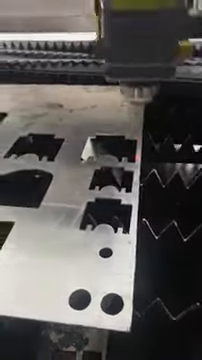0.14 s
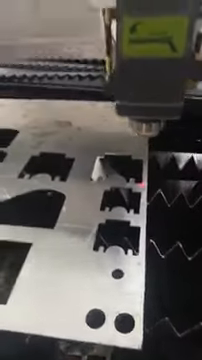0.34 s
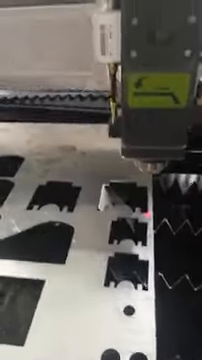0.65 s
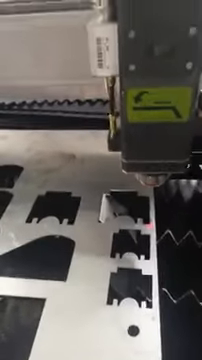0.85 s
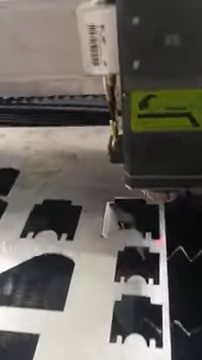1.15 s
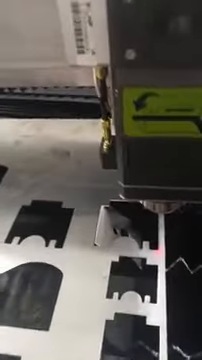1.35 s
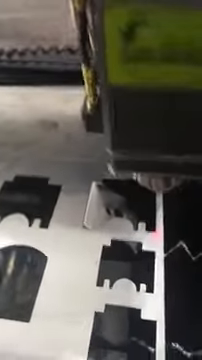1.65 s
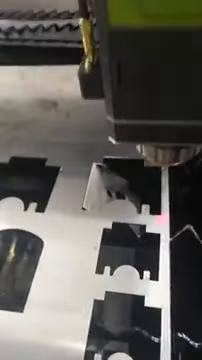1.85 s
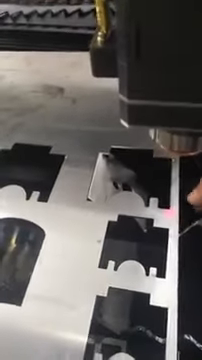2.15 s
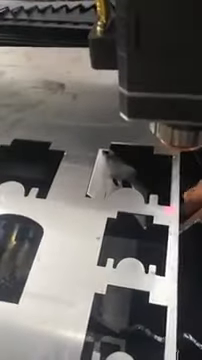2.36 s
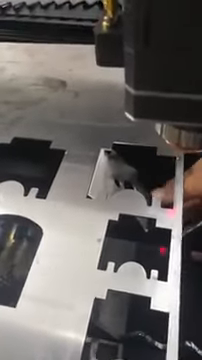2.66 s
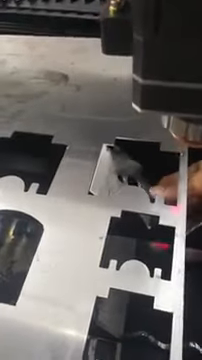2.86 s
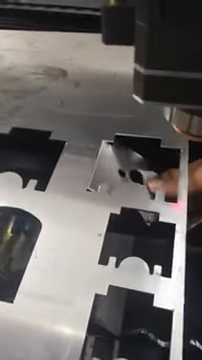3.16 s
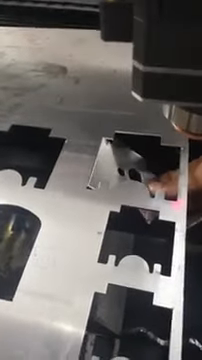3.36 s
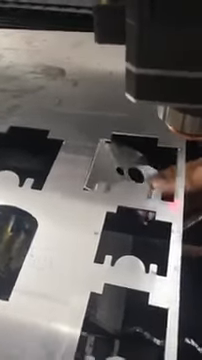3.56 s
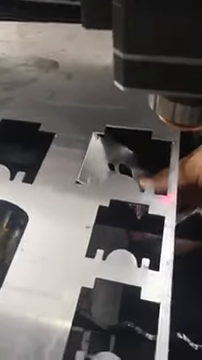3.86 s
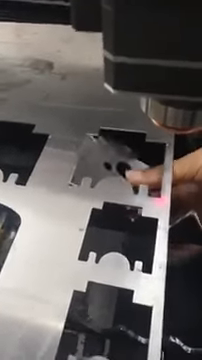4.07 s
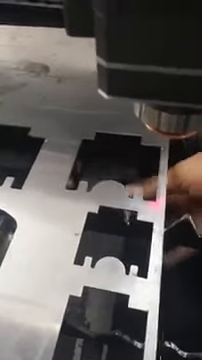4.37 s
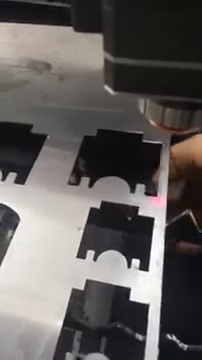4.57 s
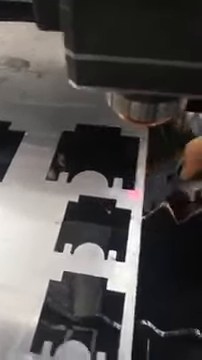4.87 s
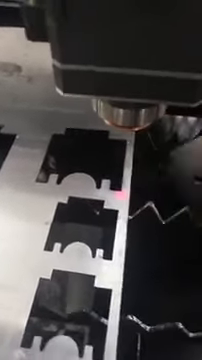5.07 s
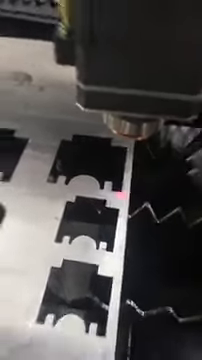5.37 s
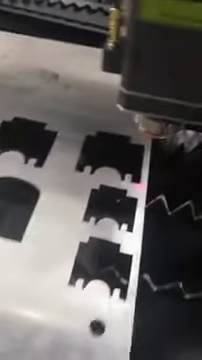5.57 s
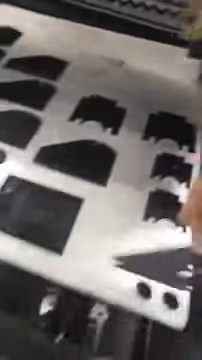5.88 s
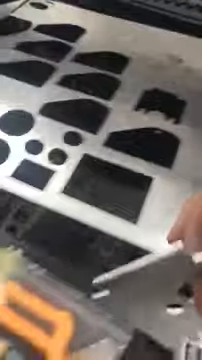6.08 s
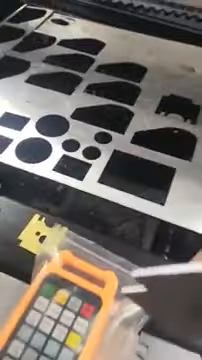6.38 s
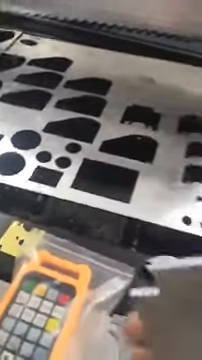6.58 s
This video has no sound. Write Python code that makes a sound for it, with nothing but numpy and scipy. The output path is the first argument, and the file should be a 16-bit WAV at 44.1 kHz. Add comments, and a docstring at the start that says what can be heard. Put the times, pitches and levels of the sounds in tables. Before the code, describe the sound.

Close stereo pickup beside a laser cutter's metal sheet. Roaring, thumping gas hiss opens at full force, becomes hollow and resonant, then sinks in pitch and level to a sizzle and fades. Low machine hum and fan rumble stay throughout, ducked by the loud parts. Sparse metallic ticks lead to a hard snap and rapid rattling bounces of a loose steel part, a short ringing scrape, and later tiny ticks with a gritty rasp.

```python
"""A workshop, at the edge of a steel sheet in a laser cutter, heard with a spaced pair of microphones.
High-pressure gas hisses from the nozzle: shaped noise, first open, then hollow, that drains to a sizzle and a seep.
The machine hums on throughout: rumbling noise, duct resonances and steady tones.
A hand works a cut part loose: cracks and decaying noise through the modes of the sheet make it tick,
snap free with a clatter and ping; trains of small slips make it scrape along the sheet."""
import sys
import numpy as np
from scipy import signal
from scipy.fft import rfft, irfft
from scipy.io import wavfile
from scipy.ndimage import uniform_filter1d, map_coordinates

SR = 44100
rng = np.random.default_rng(int(sys.argv[2]) if len(sys.argv) > 2 else 0)


def wav_out(sig):
    """Save sig, one row per channel (or a flat mono array), as 16-bit PCM at SR to the path in sys.argv[1]."""
    wavfile.write(sys.argv[1], SR, np.round(np.clip(np.atleast_2d(sig).T, -1, 1) * 32767).astype(np.int16))


N = 296352


def from_db(db):
    """Decibels to gain."""
    return 10 ** (np.asarray(db) / 20)


def rms_one(x):
    """Scale to unit power."""
    return x / np.sqrt(np.mean(x ** 2) + 1e-20)


def at_hz(rows, hz):
    """The columns of a table, interpolated on a log-frequency axis."""
    points, *columns = np.transpose(rows)
    return [np.interp(np.log(hz + 1e-9), np.log(points), column) for column in columns]


def cut(x, hz, kind, order=2):
    """Butterworth low- or high-pass."""
    sections = signal.butter(order, np.clip(hz, 10, SR * .45), kind, fs=SR, output="sos")
    return signal.sosfilt(sections, x)


def resonance(x, hz, width):
    """A two-pole resonance with gain 1 on top."""
    r = np.exp(-np.pi * width / SR)
    poles = [1, -2 * r * np.cos(2 * np.pi * hz / SR), r * r]
    return signal.lfilter((1 - r * r) / 2 * np.array([1, 0, -1]), poles, x)


def gliding_resonance(x, hz, width, size=128):
    """A resonance whose centre follows a curve, stepped block by block."""
    r = np.exp(-np.pi * width / SR)
    out, state = np.empty_like(x), np.zeros((2, 2))
    for i in range(0, N, size):
        poles = [1, -2 * r * np.cos(2 * np.pi * hz[i] / SR), r * r]
        out[:, i:i + size], state = signal.lfilter([1, 0, -1], poles, x[:, i:i + size], zi=state)
    return out


def ramp(start_s, end_s):
    """Rises evenly from 0 to 1 between two moments."""
    return np.clip((np.arange(N) / SR - start_s) / max(end_s - start_s, 1 / SR), 0, 1)


def held(start_s, end_s, fade_s):
    """1 between two moments, fading in before and out after."""
    return ramp(start_s - fade_s, start_s) - ramp(end_s, end_s + fade_s)


def wander(turns, size):
    """Smooth chance with so many turns over its length."""
    knots = rng.standard_normal(2048)
    return map_coordinates(knots, [np.linspace(0, turns, size)], order=2, mode="wrap")


def drift(per_s):
    """Smooth chance in time, so many turns a second."""
    return wander(per_s * N / SR, N)


def field(spectrum, pair, ripple_db):
    """Noise at two spaced microphones, partly shared between them; reflections ripple its spectrum."""
    hz = np.arange(N // 2 + 1) * SR / N
    level_db, = at_hz(spectrum, hz)
    alike, lag, pan_db = at_hz(pair, hz)
    shared, own = rfft(rng.standard_normal((2, N)))
    left = shared * from_db(pan_db / 2)
    right = alike * shared * np.exp(1j * lag) + np.sqrt(1 - alike ** 2) * own
    right = right * from_db(-pan_db / 2)
    # the ripple is weaker in the bass
    ripple = np.array([wander(900, len(hz)), wander(900, len(hz))]) * hz / (hz + 500)
    return rms_one(irfft(np.array([left, right]) * from_db(level_db + ripple_db * ripple), N))


# fans and pumps across the workshop: f/Hz, level/dB per Hz
FANS_AND_PUMPS = [(18, -18), (50, 2), (80, -9), (145, -2), (225, -4.5), (340, -11), (520, -13.5),
                  (750, -13), (1250, -19.5), (2100, -16.5), (3200, -28), (4800, -31.5), (7700, -39),
                  (9500, -49.5), (11200, -61), (13300, -55)]
# the microphone pair in the workshop: f/Hz, likeness/0-1, left lag/rad, left-right level/dB
IN_WORKSHOP = [(70, 1, 0, 0), (150, .98, 0, 0), (230, .9, 0, -.5), (380, .5, 1, -1), (520, .5, 3, -2),
               (720, .55, 3.1, -.8), (1300, .33, 5.4, -2.6), (2100, .28, 8, -3.2), (4000, .18, 14.8, -2),
               (7500, .1, 26, 0)]
# resonances of the air ducts: f/Hz, width/Hz, gain/dB
DUCTS = [(1184, 18, -2), (1890, 66, -28), (4600, 130, -4), (4900, 160, -12), (5560, 130, -4)]
# mains hum: f/Hz, level/dB against the machine noise
HUM = [(50, -41), (100, -3.5), (150, -34), (200, -5.5), (284, -26)]
# drive whine: f/Hz, level/dB against the machine noise
WHINE = [(10664, -34.5), (12000, -57)]
# level of the machine as the microphone moves about: t/s, level/dB
MACHINE_LEVEL = [(0, -37), (2.0, -34), (3.0, -37), (6.72, -36)]
# one more low drone grows as the microphone turns away (dB against the machine noise)
DRONE_HZ, DRONE_DB, DRONE_FROM_S, DRONE_FULL_S = 144.5, -5, 6, 6.4


def machine():
    """Fans and pumps rumble, air sings faintly in the ducts, windings hum and the drives whine as near-steady tones."""
    t = np.arange(N) / SR
    sound = field(FANS_AND_PUMPS, IN_WORKSHOP, ripple_db=1.2)
    sound = sound + sum(from_db(db) * resonance(sound, hz, width) for hz, width, db in DUCTS)
    for hz, level_db in HUM + WHINE:
        phase = 2 * np.pi * (hz * t + rng.random()) + 0.18 * drift(4.15)
        sound = sound + np.sqrt(2) * from_db(level_db + 0.6 * drift(5.9)) * np.sin(phase)
    drone = np.sqrt(2) * np.sin(2 * np.pi * DRONE_HZ * t + 0.58 * drift(6.6))
    sound = sound + drone * from_db(DRONE_DB) * ramp(DRONE_FROM_S, DRONE_FULL_S)
    return sound * from_db(np.interp(t, *np.transpose(MACHINE_LEVEL)))


# dense ringing of the sheet: f/Hz, level/dB per Hz
SHEET = [(300, 5.5), (800, 7), (1150, 3), (1600, 4.5), (2000, 7), (2650, 6), (3100, -1), (3800, 0),
         (4400, -5), (5700, -1.5), (7600, -6.5), (8600, -19.5), (11000, -32), (15000, -27)]


def through_sheet(x):
    """Colour a force with the crowded modes of the sheet, as a minimum-phase filter."""
    size = x.shape[-1]
    level_db, = at_hz(SHEET, np.linspace(0, SR / 2, 513))
    # minimum_phase halves the dB, hence the doubled level
    symmetric = irfft(from_db(2 * level_db))[np.arange(-255, 256)] * np.hanning(511)
    taps = signal.minimum_phase(symmetric)
    return signal.fftconvolve(x, taps[None] / np.linalg.norm(taps), axes=1)[:, :size]


# resonances of the small part: f/Hz, width/Hz, gain/dB
PART = [(3340, 130, 7), (4850, 120, -7), (5600, 170, -12)]
# the part slides on the sheet: start t/s, end t/s, level/dB at the end, grip that damps its ringing/0-1
SLIDES = [(4.674, 5.006, -53, 0), (5.535, 5.672, -43.5, 0.9)]
SLIDE_FADE_S, SLIDE_HISS_DB = 0.02, -16   # hiss against the ringing
SLIDE_SWELL_DB_PER_S = 57   # a firmly gripped slide gathers speed; scaled by the grip
# each slip is between -0.65 and 1 times the range in strength
SLIPS_PER_S, SLIP_RANGE_DB, SLIP_DECAY_S = 250, 7, .005


def scrape():
    """Burrs on the cut edge catch in small quick slips: held loosely the part rings and hisses, gripped hard it rasps."""
    slip_power = from_db(2 * SLIP_RANGE_DB * rng.uniform(-0.65, 1, N))
    slips = (rng.random(N) < SLIPS_PER_S / SR) * slip_power
    power = signal.lfilter([1], [1, -np.exp(-2 / (SLIP_DECAY_S * SR))], slips + 1e-18)
    grit = rms_one(np.sqrt(power))
    rub = cut(through_sheet(rng.standard_normal((2, N))), 2000, "high")
    # a narrow hiss near 7 kHz
    hiss = rms_one(cut(cut(rng.standard_normal((2, N)), 7000, "high"), 7200, "low", order=4))
    ringing = rms_one(rub + sum(from_db(db) * resonance(rub, hz, width) for hz, width, db in PART))
    ringing = ringing + from_db(SLIDE_HISS_DB) * hiss
    rasp = rms_one(resonance(rub, 3800, 560) + from_db(-13) * resonance(rub, 4900, 450))
    sound = 0
    for start_s, end_s, level_db, grip in SLIDES:
        swell_db = grip * SLIDE_SWELL_DB_PER_S * np.minimum(np.arange(N) / SR - end_s, 0)
        slide = (1 - grip) * ringing + grip * rasp
        sound = sound + slide * from_db(level_db + swell_db) * held(start_s, end_s, SLIDE_FADE_S)
    return sound * grit


# the freed part pings: start t/s, rise t/s, f/Hz, level/dB at the top of the rise
PINGS = [(4.686, .04, 4904, -51.5), (4.78, .025, 5750, -55.5), (4.81, .05, 4904, -54),
         (4.89, .12, 3230, -53)]
PING_T60_S, PING_WIDTH_HZ = 0.42, 40


def pings():
    """As it rubs free the part sings briefly and hoarsely, in whichever mode the fingers leave undamped."""
    sound = 0
    for start_s, rise_s, hz, level_db in PINGS:
        t = np.arange(N) / SR - start_s
        decay = from_db(level_db - 60 * np.maximum(t - rise_s, 0) / PING_T60_S)
        envelope = ramp(start_s, start_s + rise_s) * decay
        sound = sound + envelope * rms_one(resonance(rng.standard_normal((2, N)), hz, PING_WIDTH_HZ))
    return sound


# longest modes of the sheet: f/Hz, level/dB, decay by 60 dB t60/s
MODES_OF_SHEET = [(795, -16, .4), (856, -19, .42), (1577, -19, .3), (2030, -15, .28), (2176, -12, .36),
                  (2233, -14, .36), (2402, -11, .38), (2455, -13.5, .45), (2520, -14, .42), (3155, -24, .3),
                  (3478, -24, .3), (3800, -25, .3), (4010, -24, .33), (5580, -23, .26)]
# every touch starts with a crack (dB against the bending waves) that comes back from the edges of the sheet
CRACK_DB, EDGE_ECHO_S, EDGE_LOSS_DB = 19, .003, 1.2
CHATTER_DB, CHATTER_PER_S, CHATTER_S = 2.8, 600, .04   # chatter of the edge: depth, rate, fading time
LEFT_LATE_S = .0006   # the crack reaches the left microphone later


def knock(level_db, low_hz, high_hz, ring_db, t60, spread_s=0.01, tail_db=-19, tail_t60=1.0, ripple_db=3.0):
    """A crack and its edge echoes, bending waves that spread through the sheet and die, and a few lasting modes."""
    t = np.arange(SR) / SR
    decay = from_db(-60 * np.maximum(t - spread_s, 0) / t60) + from_db(tail_db - 60 * t / tail_t60)
    # each point of contact favours its own modes
    waves = rfft(rng.standard_normal((2, SR))) * from_db(ripple_db * wander(256.3, SR // 2 + 1))
    # the edge chatters while it is in contact
    chatter = from_db(CHATTER_DB * wander(CHATTER_PER_S, SR) * np.exp(-t / CHATTER_S))
    force = rms_one(irfft(waves, SR)) * decay * chatter
    # the crack itself (k = 0), then three echoes of alternating sign
    for k, stray in enumerate(rng.uniform(-.3, .3, size=4)):
        arrival_s = EDGE_ECHO_S * (k + stray * (k > 0)) + np.array([LEFT_LATE_S, 0])
        force[[0, 1], (arrival_s * SR).astype(int)] += from_db(CRACK_DB - EDGE_LOSS_DB * k) * (-1) ** k
    sound = through_sheet(force)
    ring = 0
    for hz, mode_db, mode_t60 in MODES_OF_SHEET:
        strength = from_db(ring_db + mode_db + rng.normal(0, 1.6) - 60 * t / mode_t60)
        ring = ring + strength * np.sin(2 * np.pi * (hz * t + rng.random((2, 1))))
    sound = cut(sound, low_hz, "high", order=4) + cut(ring, low_hz, "high", order=1)
    sound = cut(sound, high_hz, "low", order=4)
    # the level is that of the first 20 ms
    return from_db(level_db) * sound / np.std(sound[:, :SR // 50])


# the part ticks on the sheet, damped by the finger: t/s, level/dB, highest f/Hz, t60/s
TICKS = [(2.124, -36, 12100, 0.24), (2.652, -37, 7330, 0.2), (2.667, -34, 7200, 0.21),
         (2.861, -45, 11880, .15), (2.96, -48, 14000, .15), (3.082, -27, 3450, .12),
         (3.084, -40, 6500, .18), (3.104, -29.5, 3500, 0.19), (3.112, -42, 11000, .1),
         (3.926, -42, 15000, .16), (5.478, -52, 15500, .15), (5.486, -53, 15000, .15),
         (5.520, -50, 14000, .14), (5.553, -52, 15000, .2), (5.605, -44, 5000, .08),
         (5.641, -50, 5200, .08), (5.652, -49, 4400, .08), (5.687, -41.5, 4350, 0.096)]
# the part snaps free and bounces: t/s, level/dB before the last two columns, free ringing/dB,
# treble gain/dB of an edge-on hit, clang gain/dB
BOUNCES = [(4.260, -18, 2, 3.5, 1.5), (4.270, -20, -6, 1.5, -4), (4.301, -22, 3, 3.5, 1),
           (4.309, -19, -5, -1, -4), (4.366, -27, 5, 8, 2.5), (4.403, -33.5, 6, 2, 8),
           (4.472, -39, -1, -8, 8), (4.506, -34, 10.5, 6.5, 3.5), (4.541, -44, 11, -3, 4),
           (4.576, -40, 10, 3, 5), (4.612, -48, 8, -4, -2), (4.783, -43.5, -6, -3, -3)]
TICK_LOW_HZ, TICK_RING_DB = 1790, -8   # lowest frequency of a firm tick; lasting modes of a damped touch
BOUNCE_LOW_HZ, BOUNCE_HIGH_HZ = 1090, 13400   # range of a firm bounce
BOUNCE_T60_S, FAR_EDGE_T60_S = 0.18, 0.42   # decay of the bending waves
CLANG_HZ, CLANG_WIDTH_HZ = 3900, 1200   # where the part clangs once it is loose
# on a hard bounce the far edge lands just afterwards, softer and duller
FAR_EDGE_S, FAR_EDGE_DB, FAR_EDGE_LOW_HZ, FAR_EDGE_HIGH_HZ = .0105, -7.5, 950, 3300
# lighter touches sound thinner: the lowest frequency rises an octave for so many dB below a firm touch
FIRM_DB, THINNING_DB_PER_OCTAVE = -32, 25


def loose_part():
    """All the touches of the cut part on the sheet, a little to the right of the microphones."""
    sound = scrape() + pings()
    touches = [(s, level_db, TICK_LOW_HZ, high_hz, TICK_RING_DB, t60, 0, 0)
               for s, level_db, high_hz, t60 in TICKS]
    for s, level_db, ring_db, treble_db, clang_db in BOUNCES:
        touches.append((s, level_db, BOUNCE_LOW_HZ, BOUNCE_HIGH_HZ, ring_db,
                        BOUNCE_T60_S, treble_db, clang_db))
        if level_db > FIRM_DB + 8:
            touches.append((s + FAR_EDGE_S, level_db + FAR_EDGE_DB, FAR_EDGE_LOW_HZ, FAR_EDGE_HIGH_HZ,
                            TICK_RING_DB, FAR_EDGE_T60_S, 0, 0))
    for s, level_db, low_hz, high_hz, ring_db, t60, treble_db, clang_db in touches:
        start = int(s * SR)
        thinning = 2 ** ((FIRM_DB - level_db) / THINNING_DB_PER_OCTAVE)
        hit = knock(level_db, low_hz * thinning, high_hz, ring_db, t60)[:, :N - start]
        hit = hit + (from_db(clang_db) - 1) * resonance(hit, CLANG_HZ, CLANG_WIDTH_HZ)
        hit = hit + (from_db(treble_db) - 1) * cut(hit, 5800, "high", order=1)
        sound[:, start:start + hit.shape[1]] += hit
    pan_db = -2.5   # left against right
    return sound * from_db([[pan_db / 2], [-pan_db / 2]])


# the gas comes on with a surge, full until the first moment, that settles with this time constant
SURGE_FULL_UNTIL_S, SURGE_SETTLE_S = 0.076, 0.26


def surge():
    """Excess pressure as the gas comes on, 0-1: full at first, then dying exponentially."""
    return np.exp(-np.maximum(np.arange(N) / SR - SURGE_FULL_UNTIL_S, 0) / SURGE_SETTLE_S)


# single eddies that thump the microphone: t/s, peak level/dB
THUMPS = [(0.159, -12), (.327, -14), (0.515, -17.5)]
# gas buffets the microphone, harder and brighter in the surge, until the stream misses it
BUFFET_DB, BUFFET_SURGE_DB, BUFFET_ROAR_DB, BUFFET_END_S = -43, 28, -19, 0.75


def buffet():
    """Lumpy eddies of the gas stream hit the microphone ports; the surge adds smaller, roaring ones."""
    shared, own = rng.standard_normal(N), rng.standard_normal((2, N))
    eddies = cut(shared, 143, "low") + cut(cut(own, 120, "high"), 194, "low")
    roar = rms_one(resonance(rng.standard_normal((2, N)), 245, 110))
    roar = roar * from_db(BUFFET_ROAR_DB) * surge() ** 2
    sound = rms_one(cut(eddies, 62, "high")) * from_db(BUFFET_DB + BUFFET_SURGE_DB * surge()) + roar
    sound = sound * held(SURGE_FULL_UNTIL_S, BUFFET_END_S, fade_s=0.14) * from_db(3.7 * drift(34.0))
    eddy_s = 0.0015
    for s, peak_db in THUMPS:
        # a passing eddy pushes, then pulls
        u = (np.arange(N) / SR - s) / eddy_s
        sound = sound - from_db(peak_db) * u * np.exp((1 - u ** 2) / 2)
    return sound


# jet in open air: f/Hz, level/dB per Hz
OPEN_JET = [(120, -2), (300, 3), (500, -1), (800, 1.5), (1100, 1), (1450, 1.5), (1800, 6), (2600, 6),
            (3200, 2.5), (5200, 1.5), (7500, -1.5), (8500, -8.5), (10500, -15), (14500, -17)]
# jet close over the sheet: f/Hz, level/dB per Hz
HOLLOW_JET = [(380, -28), (600, -14.5), (830, -17), (980, -8), (1400, -7), (1850, 1), (2200, 0.5),
              (2750, -1), (3150, -6.5), (5200, -7), (7600, -8.5), (8400, -17.5), (10500, -21.5),
              (14500, -21)]
# the microphone pair in the open jet: f/Hz, likeness/0-1, left lag/rad, left-right level/dB
IN_OPEN_JET = [(100, .6, 0, 0), (300, .5, 2.6, 0), (600, .72, 3.1, -2.6), (1400, .5, 6.2, -5.5),
               (1900, .15, 7, -6.8), (2600, .2, 9.2, -4.5), (5000, .1, 13, -.7), (8000, .05, 16, .3)]
# the microphone pair in the hollow jet: f/Hz, likeness/0-1, left lag/rad, left-right level/dB
IN_HOLLOW_JET = [(250, .4, 0, 0), (550, .52, 3.3, -3), (800, .2, 4.5, -6), (1000, .55, 6.1, -2.4),
                 (1400, .72, 6.2, -2.2), (2000, .42, 5.8, -5.8), (3000, .38, 7, .8), (5000, .2, 6, -1.2),
                 (10000, .07, 5, -.5)]
# cavities of the nozzle and the bed, some low ones singing out as the flow slows:
# f/Hz, width/Hz, gain/dB times the pressure (0-1), gain/dB times (1.5 - pressure); the two gains add up
CAVITIES = [(816, 73, -18, 10), (960, 35, -12, 0), (1130, 35, -16, -16), (1340, 28, -9, 5),
            (1453, 45, -7, 1), (1740, 80, -18, 1), (1997, 30, -2, -5), (2075, 50, -3, -7),
            (2490, 97, -6, -9), (2840, 41, 0, -25)]
# gain of the jet above about 2 kHz: t/s, level/dB
TREBLE = [(0, -0.5), (.52, 7.5), (1.1, -0.5), (1.4, -3), (1.85, -4)]
OPEN_JET_DB, SURGE_DB = -19, 13.5
# the jet starts to ring in the gap above the sheet, and swells until the valve shuts
HOLLOW_FROM_S, HOLLOW_FULL_S, HOLLOW_JET_DB, SWELL_DB_PER_S = 0.67, 0.95, -8.5, 10
# the valve shuts and the line drains evenly; the hiss goes with a power of the pressure
SHUT_S, EMPTY_S, PRESSURE_POWER = 1.267, 2.048, 1.54
# as the pressure sinks one resonance of the gap grows and glides down
GLIDE_SHARE, GLIDE_FULL_HZ, GLIDE_EMPTY_HZ, GLIDE_WIDTH_HZ = 0.58, 1790, 1100, 580
GAP_HZ, GAP_WIDTH_HZ = 2620, 990   # the broad ringing that gives way to it
# a thin sizzle at the nozzle outlasts the jet
SIZZLE_DB, SIZZLE_FALL_DB_PER_S, SIZZLE_END_S, SIZZLE_ABOVE_HZ = -32.5, 21.5, 2.134, 4000
# last gas seeping out of the drained line; the fade serves the sizzle too
SEEP_DB, SEEP_FALL_DB_PER_S, SEEP_END_S, SEEP_FADE_S = -42, 2.5, 3.18, 0.078


def gas_jet():
    """Turbulent hiss, first open, then ringing in the gap above the sheet; it drains away to a sizzle and a seep."""
    t = np.arange(N) / SR
    hollow, pressure = ramp(HOLLOW_FROM_S, HOLLOW_FULL_S), 1 - ramp(SHUT_S, EMPTY_S)
    gap = field(HOLLOW_JET, IN_HOLLOW_JET, ripple_db=4.0)
    gap = gap + sum(from_db(full_db * pressure + drained_db * (1.5 - pressure)) * resonance(gap, hz, width)
                    for hz, width, full_db, drained_db in CAVITIES)

    share = GLIDE_SHARE * (1 - pressure) ** 2
    glide_hz = GLIDE_EMPTY_HZ + (GLIDE_FULL_HZ - GLIDE_EMPTY_HZ) * pressure ** 2
    glide = gliding_resonance(gap, glide_hz, GLIDE_WIDTH_HZ)
    glide = gliding_resonance(glide, glide_hz, GLIDE_WIDTH_HZ)
    # hold the glide at an even level
    glide = glide / np.sqrt(uniform_filter1d(np.mean(glide ** 2, axis=0), size=4096))
    ringing = gap + share * (glide - resonance(gap, GAP_HZ, GAP_WIDTH_HZ))
    ringing = ringing * from_db(HOLLOW_JET_DB - SWELL_DB_PER_S * np.maximum(SHUT_S - t, 0))

    free = field(OPEN_JET, IN_OPEN_JET, ripple_db=3.5) * from_db(OPEN_JET_DB + SURGE_DB * surge())
    hiss = np.sqrt(1 - hollow) * free + np.sqrt(hollow) * ringing
    treble_gain = from_db(np.interp(t, *np.transpose(TREBLE)))
    hiss = hiss + (treble_gain - 1) * cut(hiss, 2240, "high", order=1)
    hiss = hiss * pressure ** PRESSURE_POWER * from_db(.5 * drift(39.9))

    sizzle = rms_one(cut(rng.standard_normal((2, N)), SIZZLE_ABOVE_HZ, "high", order=4))
    sizzle = sizzle * held(SHUT_S, SIZZLE_END_S, SEEP_FADE_S)
    sizzle = sizzle * from_db(SIZZLE_DB - SIZZLE_FALL_DB_PER_S * (t - SHUT_S))
    seep = cut(cut(gap, 590, "high", order=1), 5600, "low") * held(EMPTY_S, SEEP_END_S, SEEP_FADE_S)
    seep = seep * from_db(SEEP_DB - SEEP_FALL_DB_PER_S * (t - EMPTY_S))
    return hiss + sizzle + seep


def scene():
    """Machine, part and gas together at the microphones."""
    return machine() + loose_part() + buffet() + gas_jet()


# gain control of the recorder: it takes away a share of the level above the threshold
GAIN_THRESHOLD_DB, GAIN_SHARE, GAIN_ATTACK_S, GAIN_RELEASE_DB_PER_S = -31, 0.3, 0.039, 11


def gain_control(x):
    """Loud sound turns the gain down quickly; it creeps back afterwards."""
    size = int(GAIN_ATTACK_S * SR)
    # mean power of the moments just past
    power = uniform_filter1d(np.mean(x ** 2, axis=0), size, origin=(size - 1) // 2)
    level_db = 10 * np.log10(np.abs(power) + 1e-12)
    cut_db = GAIN_SHARE * np.maximum(level_db - GAIN_THRESHOLD_DB, 0)
    recovery_db = GAIN_RELEASE_DB_PER_S * np.arange(N) / SR
    return x * from_db(recovery_db - np.maximum.accumulate(cut_db + recovery_db))


def record(dry):
    """Gain control ducks the hum under the jet and the clatter; full scale clips the peaks; the top is cut steeply."""
    limited = np.clip(gain_control(dry), -1, 1)
    cutoff_hz = 15100
    return signal.sosfilt(signal.ellip(12, .1, 80, cutoff_hz, fs=SR, output="sos"), limited)


dry = scene()
out = record(dry)
wav_out(out)
```